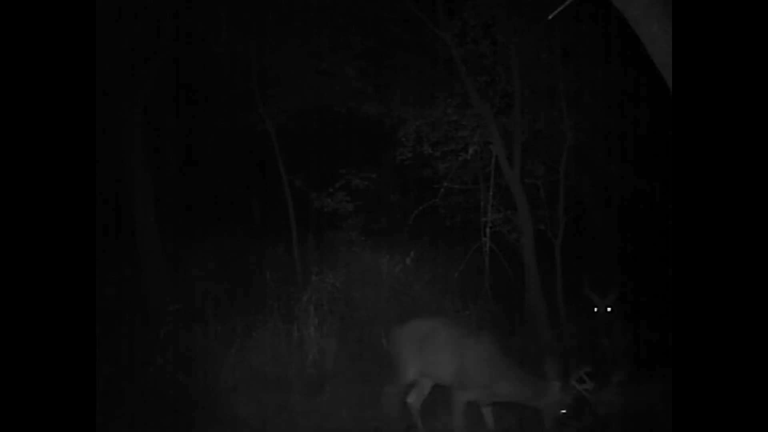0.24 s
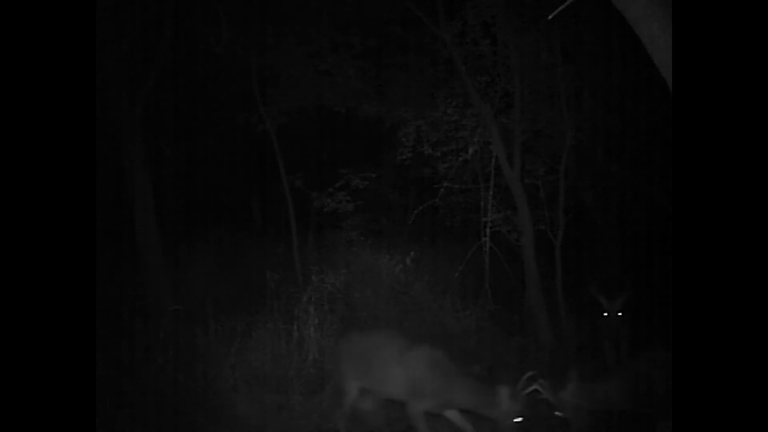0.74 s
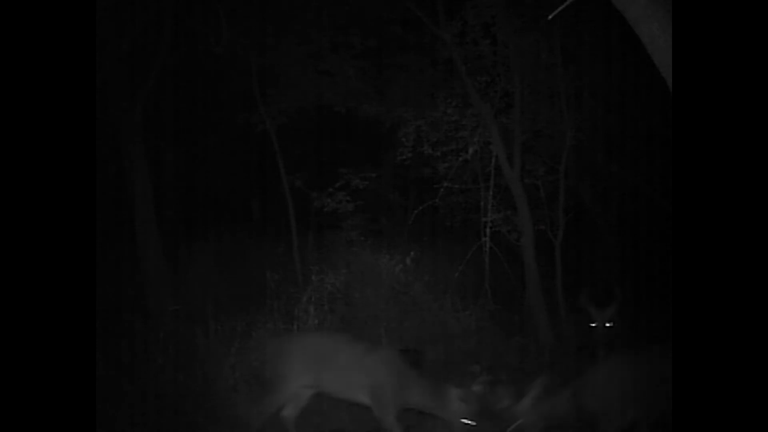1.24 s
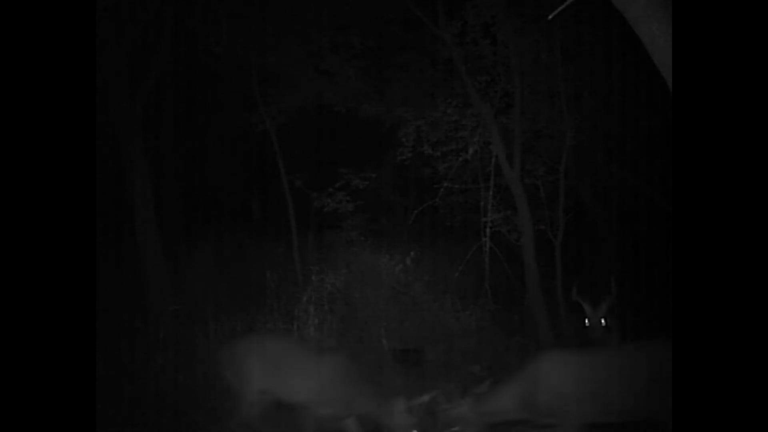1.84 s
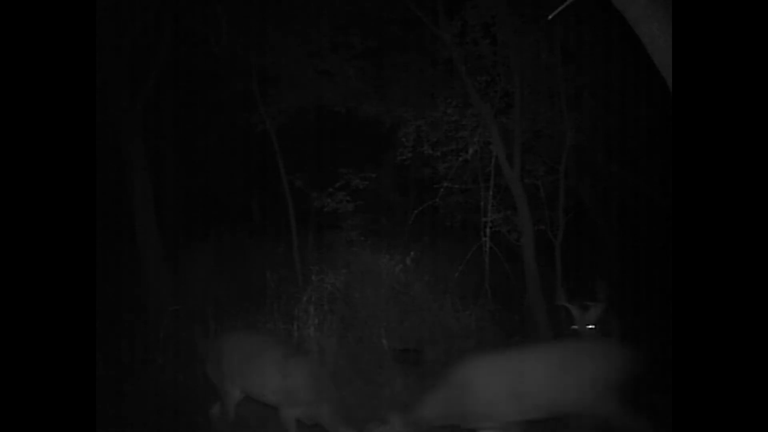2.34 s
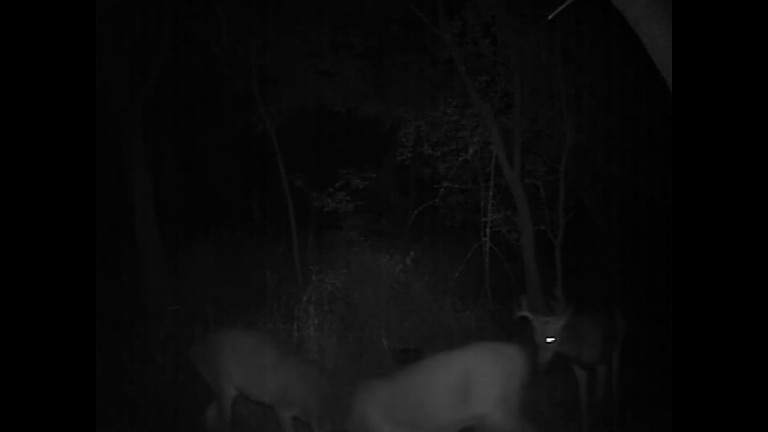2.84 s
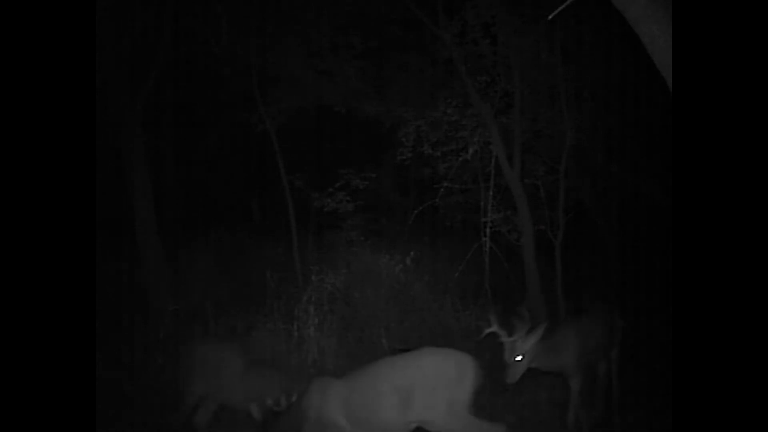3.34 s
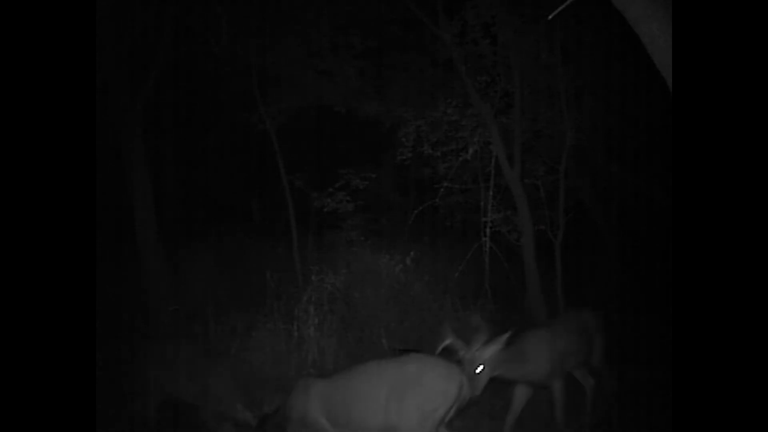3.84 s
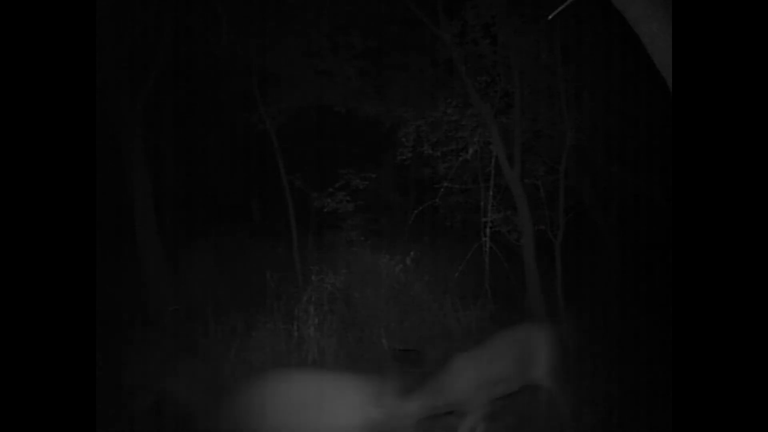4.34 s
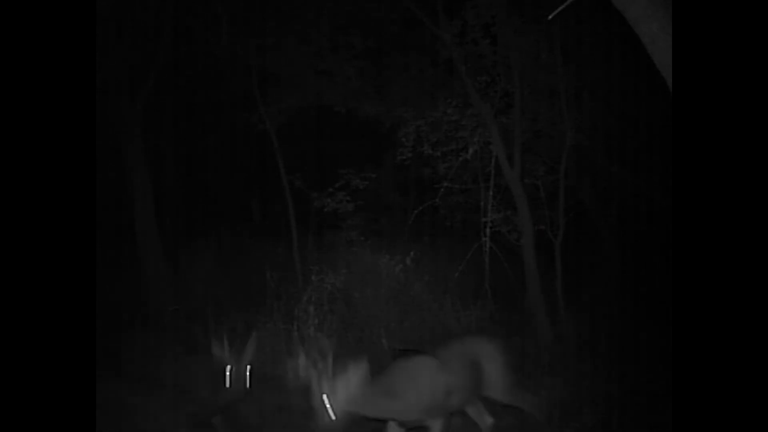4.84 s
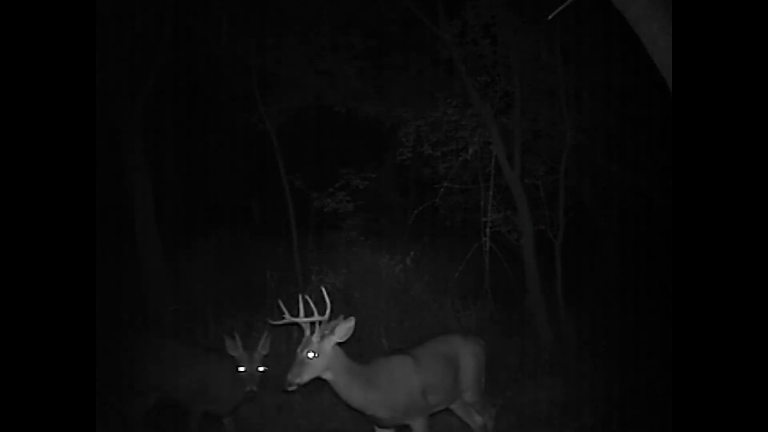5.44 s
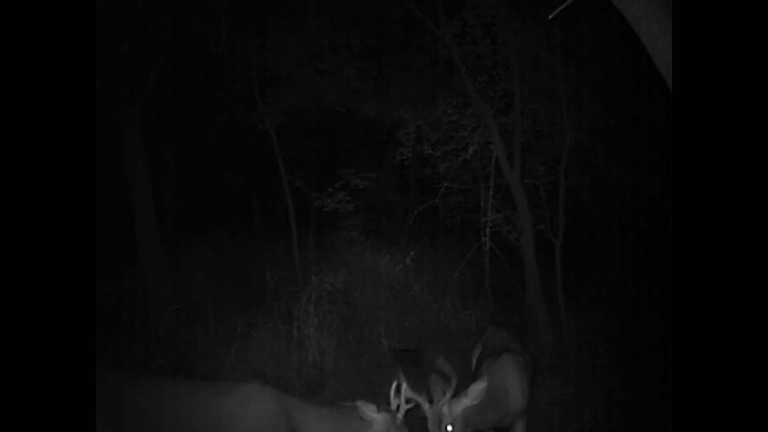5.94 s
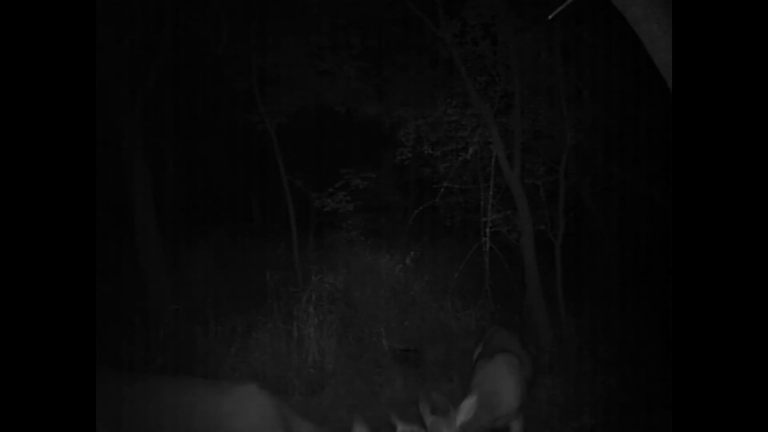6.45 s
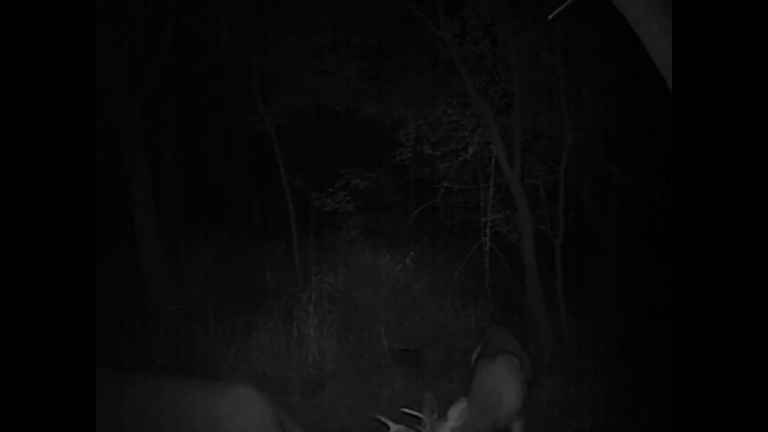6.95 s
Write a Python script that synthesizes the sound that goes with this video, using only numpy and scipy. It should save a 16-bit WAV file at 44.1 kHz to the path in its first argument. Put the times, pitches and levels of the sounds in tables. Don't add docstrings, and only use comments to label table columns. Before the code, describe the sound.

Close outdoors at night, two deer spar. Light bony antler ticks begin softly, then a sharp crack, then scattered clacks and skids. Hooves shuffle in dry leaves and small twigs snap. The rustling swells before the loudest double crack, then thins to a few knocks. Each blow scatters briefly off the trees. The small boxed microphone sounds hollow and nasal, with steady faint hiss and rumble.

```python
import sys
import numpy as np
from scipy import signal
from scipy.fft import rfft, irfft
from scipy.io import wavfile

SR = 44100
rng = np.random.default_rng(int(sys.argv[2]) if len(sys.argv) > 2 else 0)


def dump_mix(stems):
    frames = np.atleast_2d(stems).T
    limited = np.clip(frames, -1, 1)
    pcm = np.round(limited * 32767).astype(np.int16)
    wavfile.write(sys.argv[1], SR, pcm)


def makeup_ratio(level_db):
    decades = np.asarray(level_db, float) / 20
    return 10 ** decades


N = 317991

# f/Hz, width/Hz, level/dB
PORT_MODES = [(3080, 500, -1), (2373, 1300, -9.5), (3480, 610, -5.5), (1000, 950, -23)]
# f/Hz, width/Hz, level/dB
PORT_UPPER_MODES = [(6300, 1560, 0), (8760, 1200, 3.5), (11360, 2000, 2.5), (14500, 3000, -25.5)]


def rms_one(x):
    return x / np.sqrt(np.mean(x ** 2) + 1e-20)


def resonances(x, modes):
    out = 0
    for k, (hz, width_hz, level_db) in enumerate(modes):
        r = np.exp(-np.pi * width_hz / SR)
        poles = [1, -2 * r * np.cos(2 * np.pi * hz / SR), r * r]
        one = signal.lfilter([1, 0, -1], poles, x + 1e-18)
        out = out + (-1) ** k * makeup_ratio(level_db) * (1 - r * r) / 2 * one
    return out


def circuit():
    # f/Hz, level/dB per Hz
    hiss = [(12, 7.5), (30, -3), (60, -4.5), (110, -9.5), (230, -17), (500, -24), (1000, -28.5),
            (1600, -31.5), (2600, -32), (4100, -30.5), (4500, -35), (9000, -41), (14000, -43),
            (15400, -44.5)]
    # f/Hz, level/dB rms
    whines = [(15625, -93), (13640, -98)]
    hz = np.maximum(np.fft.rfftfreq(N, 1 / SR), 1)
    hiss_hz, hiss_db = np.transpose(hiss)
    colour = makeup_ratio(np.interp(np.log(hz), np.log(hiss_hz), hiss_db))
    noise = irfft(rfft(rng.standard_normal(N)) * colour * (hz > 8), N)
    t = np.arange(N) / SR
    whine = sum(makeup_ratio(db) * np.sqrt(2) * np.sin(2 * np.pi * f * t) for f, db in whines)
    return makeup_ratio(-55.5) * rms_one(noise) + whine


def drift(rate_hz):
    r = np.exp(-2 * np.pi * rate_hz / SR)
    wander = signal.lfilter([1], [1, -2 * r, r * r], rng.standard_normal(N + SR))
    return rms_one(wander[SR:])


def crackle(per_s, uneven_db, smooth):
    sizes = makeup_ratio(uneven_db * np.minimum(rng.exponential(1, N), 4)) * rng.choice([-1, 1], N)
    grains = rms_one(sizes * (rng.random(N) < per_s / SR))
    grains = grains + smooth * rng.standard_normal(N)
    return grains * makeup_ratio(1.5 * drift(80))


def shuffling():
    # t/s, rustle level/dB, dying time/s, crispness/dB re rustle
    steps = [(.125, -69, .05, -12), (.394, -64.5, 0.12, -5.5), (.564, -58.5, 0.1, -7),
             (.62, -63.5, 0.022, -1), (.958, -65, .06, -5), (1.19, -62, .04, -10), (1.292, -56.5, 0.11, -3),
             (1.397, -56.5, 0.026, -14), (1.826, -63.5, 0.17, -6.5), (2.01, -56, 0.016, -8),
             (2.42, -68.5, 0.062, -11), (2.729, -66, .04, -8), (2.893, -62, .05, -11),
             (3.123, -65.5, 0.058, -7), (3.243, -67.5, 0.024, -2), (3.356, -61, 0.021, -7),
             (3.737, -59, 0.041, -16), (3.83, -76, .04, 1), (3.946, -59.5, 0.077, -6.5),
             (4.126, -71, 0.21, -24), (4.49, -60.5, 0.08, -6.5), (4.739, -67, 0.036, -11),
             (4.834, -55.5, 0.14, -7.5), (5.09, -47, 0.076, -5), (5.43, -55, 0.086, -4.5),
             (5.617, -53, 0.067, -4.5), (6.38, -68.5, .05, -17), (6.53, -63.5, 0.081, -21)]
    # t/s, level/dB
    stir = [(0, -78.5), (.2, -68), (.8, -74.5), (2.2, -74.5), (3.4, -74.5), (4.3, -69), (4.9, -56.5),
            (5.35, -58), (5.77, -66.5), (5.8, -76), (6.1, -86), (7.21, -91.5)]
    stir_crisp_db, rise_share = -5.5, 0.6
    t = np.arange(N) / SR
    power = makeup_ratio(2 * np.interp(t, *np.transpose(stir))) * makeup_ratio([[0], [2 * stir_crisp_db]])
    for s, db, dies_s, crisp_db in steps:
        from_peak_s = np.where(t < s, (s - t) / rise_share, t - s)
        shape = np.exp(-2 * from_peak_s / dies_s)
        power = power + makeup_ratio([[2 * db], [2 * (db + crisp_db)]]) * shape
    return np.sqrt(power)


def leaves():
    # f/Hz, width/Hz, level/dB re rustle
    soil = [(449, 500, -17.5)]
    loud, crisp = shuffling()
    coarse = crackle(1500, 3.0, 0.8)
    fine = crackle(5000, 2.5, 1.3)
    litter = resonances(coarse, [(3100, 3500, -1.5), (500, 890, 1.5)])
    rustle = loud * rms_one(resonances(litter, PORT_MODES))
    thud = resonances(resonances(coarse, soil), soil)
    rustle += loud * makeup_ratio(soil[0][-1]) * rms_one(thud)
    edges_of_leaves = resonances(fine + 0.12 * coarse, PORT_UPPER_MODES)
    return rustle + crisp * rms_one(edges_of_leaves)


def notch(x, hz, width_hz):
    return signal.lfilter(*signal.iirnotch(hz, hz / width_hz, SR), x)


def contacts():
    # t/s, peak level/dB, ring f/Hz, crack/dB re peak, tine note f/Hz
    blows = [(0.5491, -33.5, 3210, -24, 1000), (0.9313, -36, 2960, -7, 2210),
             (1.2276, -12, 3230, -9.5, 1306), (1.237, -17, 3120, -21, 2150), (2.0026, -40, 3100, -12, 1950),
             (2.2571, -37.5, 3300, -13, 1300), (2.7258, -36.5, 2820, -35, 1260),
             (3.0763, -45.5, 2750, -27, 1000), (3.5464, -34, 2930, -44, 2280),
             (3.7147, -34.5, 3200, -26, 1820), (3.9123, -35.5, 3080, -7.5, 2070),
             (4.1173, -34.5, 3280, -29, 1750), (4.2225, -40.5, 3200, -23, 930),
             (4.3496, -23, 3100, -36, 860), (4.424, -42.5, 2650, -31, 770), (4.6762, -23.5, 3150, -30, 420),
             (4.8942, -35.5, 2600, -18, 640), (5.4015, -37, 3110, -19, 1070),
             (5.4804, -7, 3260, -17.5, 1855), (5.484, -10, 3300, -40, 943), (5.5172, -19, 3280, -42, 1820),
             (5.5494, -31.5, 2800, -29, 2300), (6.0496, -28, 3220, -39, 964),
             (6.4667, -22, 2950, -41, 2390)]
    # t/s, peak
    # level/dB, crack/dB re peak, low knock/dB re peak
    further_blows = [(1.2424, -37, -18, -34), (1.2485, -40, 1, -26), (3.0783, -50.5, -26, -5.5),
                     (3.543, -40, -23, -15), (3.718, -38, -22, -10), (4.3444, -40, -40, -12),
                     (4.3518, -32, -30, -33), (4.6705, -33, -29, -31), (4.6735, -34, -13, -33),
                     (4.6799, -28.5, -17, -38), (4.8273, -41, -8, -22), (4.8344, -39, -22, -26),
                     (4.8875, -43, -14, -10), (4.8973, -42.5, -14, -27), (5.0678, -48, -18, -24),
                     (5.4097, -44, -11.5, -17), (5.442, -44, -8.5, -18.5), (5.488, -26, -14.5, -10.5),
                     (5.4974, -35, -22, -16), (5.499, -34, -13.5, -14.5), (5.5058, -34, -21, -28),
                     (5.5505, -47, -32, -24), (5.6362, -43.5, -6, -21), (5.6469, -44.5, -10, -11),
                     (6.401, -38.5, -31, -19), (6.4766, -46, -22, -19), (6.4787, -53, -23, -15),
                     (6.4913, -31, -43, -29)]
    # t/s, peak level/dB, crack/dB re peak
    ticks = [(0.3612, -49, -23), (0.379, -49, -22), (0.6144, -52.5, -3), (1.1592, -54, -13),
             (1.2532, -34, -10), (1.3438, -36, -18), (1.348, -42, -24), (1.9988, -39, -13),
             (2.6163, -50, -24), (2.8803, -44.5, -17), (3.1352, -50, -17), (3.564, -47, -26),
             (3.7228, -52, -16), (3.7695, -45.5, -17), (3.9467, -44, -15), (4.1247, -49, -48),
             (4.3585, -35, -31), (4.5308, -44, -9), (4.696, -36, -17), (4.7285, -45, -14),
             (4.8372, -38, -16), (4.9633, -41, -9), (5.0309, -46, -13), (5.5706, -34.5, -33),
             (5.7753, -49, -17), (5.8609, -46, -33), (6.335, -47, -34), (6.4812, -46, -29),
             (6.934, -48.5, -17.5), (7.2058, -44, -28)]
    # t/s, peak level/dB
    twigs = [(0.623, -61), (1.3885, -62), (1.798, -65), (2.436, -67), (3.113, -61.5), (3.3536, -69),
             (3.8237, -63), (3.9562, -56), (4.2501, -66), (4.4809, -59.5), (4.997, -53.5), (5.2566, -50.5),
             (5.3136, -62), (5.624, -59), (6.18, -71)]

    def ring_hz():
        return 3080 * (1 + 0.049 * rng.standard_normal())

    out = []
    for s, db, hz, crack_db, tine_hz in blows:
        knock_db = -15.5 - 0.36 * (db + 41.5)
        out.append((s, db, hz, knock_db, crack_db, tine_hz))
    for s, db, crack_db, knock_db in further_blows:
        nearest = min(blows, key=lambda blow: abs(blow[0] - s))
        out.append((s, db, ring_hz(), knock_db, crack_db, nearest[-1]))
    snaps = [(s, db, 5.5) for s, db in twigs]
    for s, db, crack_db in ticks + snaps:
        out.append((s, db, ring_hz(), -22, crack_db, 2000))
    return out


def tine_knock(t, tine_hz):
    # f/Hz (sounding about 1.5 times higher), level/dB before a tilt to the bass, t60/s
    bone = [(500, -24, .02), (750, -16, .02), (950, -15, .02), (1390, -14, .02), (1885, -10, .02),
            (2300, -6, .02)]
    note = np.sin(2 * np.pi * tine_hz * t) + makeup_ratio(-6.5) * np.sin(2 * np.pi * 1.3 * tine_hz * t)
    knock = makeup_ratio(-60 * t / 0.026) * note
    spread_db = 3
    for hz, mode_db, t60 in bone:
        strike, detune = rng.standard_normal(2)
        level_db = 6.5 - np.log2(hz / 1000) + mode_db + spread_db * strike
        mode_hz = hz * (1.5 + spread_db / 50 * detune)
        knock += makeup_ratio(level_db - 60 * t / t60) * np.sin(2 * np.pi * mode_hz * t)
    return knock


def scatter(t60, level_db):
    t = np.arange(SR // 2) / SR
    echoes = rng.standard_normal(len(t)) * makeup_ratio(-60 * t / t60) * np.minimum(t / 0.0041, 1)
    return makeup_ratio(level_db) * echoes / np.sqrt(np.sum(echoes ** 2))


def antlers():
    # f/Hz, width/Hz, level/dB
    edge_band = [(5600, 4740, 1)]
    t = np.arange(1024) / SR
    swell_s, rise_s, crack_s = 0.00075, 0.00089, 0.0017
    swell = (t / swell_s * np.exp(1 - t / swell_s)) ** 2
    burst = np.minimum(t / 0.00099, 1) * np.exp(-t / crack_s)
    onset = np.minimum(t / rise_s, 1)
    cavity = onset * makeup_ratio(-60 * t / 0.025) * np.sin(2 * np.pi * 2980 * t)
    low, edge, crack, thrown, thrown_high = np.zeros((5, N + len(t)))
    for s, peak_db, hz, knock_db, crack_db, tine_hz in contacts():
        start = round(s * SR)
        at = slice(start, start + len(t))
        partner_hz = hz * (1.17 + 0.059 * rng.standard_normal())
        ring = np.sin(2 * np.pi * hz * t) + 0.38 * np.sin(2 * np.pi * partner_hz * t)
        low[at] += makeup_ratio(peak_db) * swell * ring
        low[at] += makeup_ratio(peak_db - 10.5) * cavity
        low[at] += makeup_ratio(peak_db + knock_db + 3.5) * tine_knock(t, tine_hz) * onset
        grit = burst * rng.standard_normal(len(t))
        crack[at] += makeup_ratio(peak_db + crack_db + 8) * grit
        edge[at] += makeup_ratio(peak_db + 0.52 * crack_db + 1) * grit
        thrown[start] += makeup_ratio(peak_db + 17.5)
        thrown_high[start] += makeup_ratio(peak_db + crack_db + 14.5)
    near = low + resonances(crack, PORT_UPPER_MODES[1:])
    near += resonances(resonances(edge, edge_band), edge_band)
    near += signal.fftconvolve(near, scatter(0.03, -13))[:len(low)]
    wood_t60_s = 0.29
    far = resonances(signal.fftconvolve(thrown, scatter(wood_t60_s, -4.5)), PORT_MODES)
    far_high = signal.fftconvolve(thrown_high, scatter(0.95 * wood_t60_s, -3.5))
    far += resonances(far_high, PORT_UPPER_MODES)
    return near[:N] + far[:N]


def scene():
    return (antlers() + notch(leaves(), 7600, 770) + circuit())[None]


def band_limit(x):
    return signal.sosfilt(signal.butter(12, 16520, fs=SR, output="sos"), x)


def record(dry):
    # fade t/s, down t/s, up t/s, back t/s, level/dB
    gaps = [
        (0.224, 0.228, 0.269, 0.277, -60),
        (5.788, 5, 7.4, 5.797, -8),
    ]
    t = np.arange(N) / SR
    gain = np.ones(N)
    for *corners_s, db in gaps:
        gain = gain * np.interp(t, corners_s, [1, makeup_ratio(db), makeup_ratio(db), 1])
    lowpass = signal.ellip(10, 0.5, 30, 15800, fs=SR, output="sos")
    return band_limit(signal.sosfilt(lowpass, dry * gain))


dry = scene()
out = record(dry)
dump_mix(out)
```